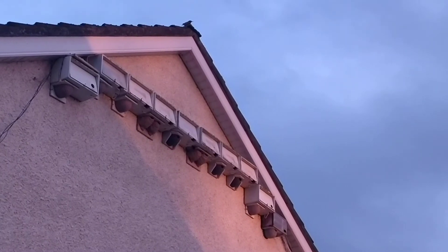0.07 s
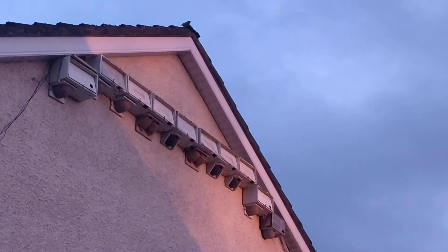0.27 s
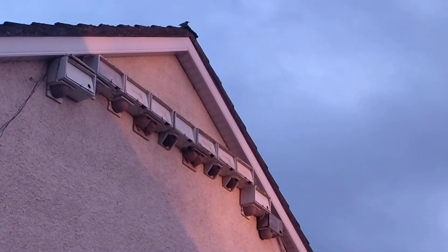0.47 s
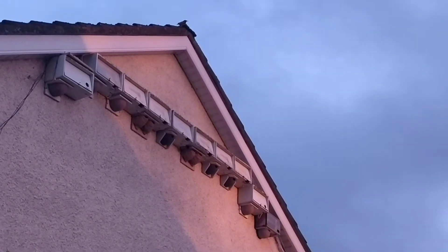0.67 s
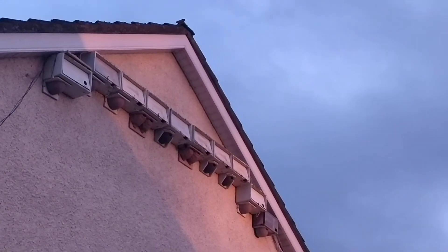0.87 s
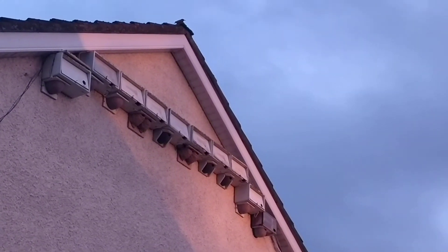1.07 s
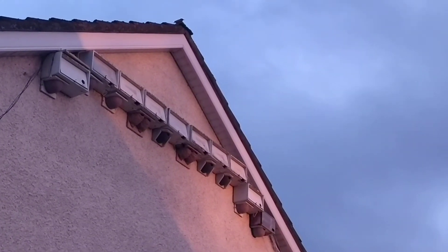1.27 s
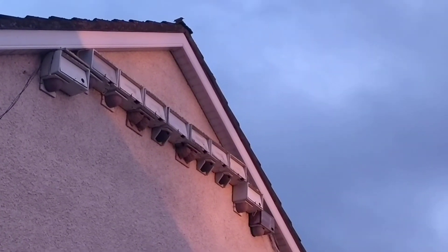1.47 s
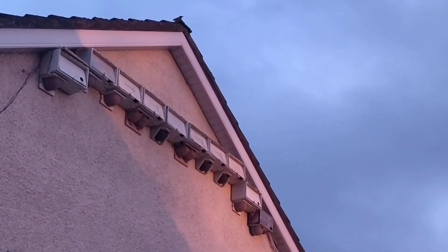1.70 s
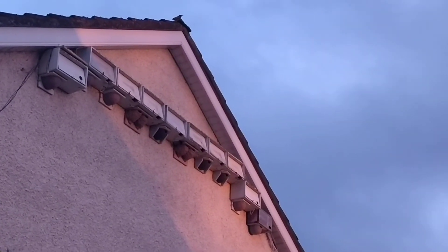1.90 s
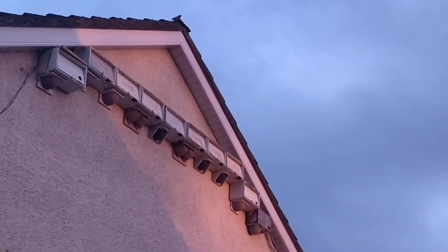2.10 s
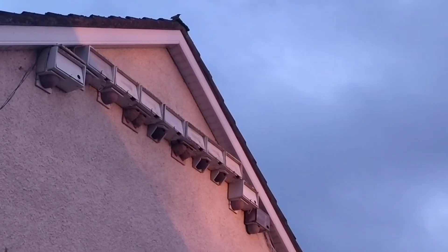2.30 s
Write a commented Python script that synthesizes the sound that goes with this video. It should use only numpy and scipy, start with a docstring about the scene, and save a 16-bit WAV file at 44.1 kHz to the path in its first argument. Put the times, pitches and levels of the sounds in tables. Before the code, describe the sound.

One brief raspy bird chirp nearby, then thin far-off swift screams over soft wind.

```python
"""A short, harsh, rising chirp from a bird close by, and thin trilled screams from swifts further off,
at dusk by the gable of a house. The chirp is two voices at once, a rasping harmonic buzz and a whistle
modulated by it; the screams are modulated tones that reverberate between the walls. Light wind buffets
the microphone, mostly its left port. Behind lie a distant traffic wash, the tyres of one far car,
a faint hum, two tiny ticks and microphone hiss."""
import sys
import numpy as np
from scipy import signal
from scipy.fft import rfft, irfft
from scipy.io import wavfile

SR = 44100
rng = np.random.default_rng(int(sys.argv[2]) if len(sys.argv) > 2 else 0)


def master(y):
    """Save y as 16-bit WAV."""
    cut = np.clip(np.atleast_2d(y).T, -1, 1)
    pcm = np.round(cut * 32767)  # scale
    wavfile.write(sys.argv[1], SR, pcm.astype(np.int16))


N = 108045
T = np.arange(N) / SR
BIN_HZ = np.fft.rfftfreq(N, 1 / SR)

# resonances of the near bird's throat and beak: frequency_hz, gain_db
VOCAL_TRACT = [(900, -30), (1800, -8.5), (2750, -1.5), (3500, -4), (4100, -2), (4800, -2), (5600, -2),
               (6400, -3), (7300, -3), (8000, -7), (8700, -22), (11000, -21), (13800, -17), (15500, -28)]


def from_db(db):
    """Amplitude ratio of a level in decibels."""
    return 10 ** (np.asarray(db) / 20)


def rms_one(x):
    """Normalisation to unit mean power."""
    return x / np.sqrt(np.mean(x ** 2) + 1e-20)


def in_time(rows):
    """Linear interpolation of a curve's columns at every sample."""
    s, *columns = np.transpose(rows)
    return [np.interp(T, s, c) for c in columns]


def envelope(rows):
    """Amplitude envelope from rows of time_s, level_db."""
    return from_db(in_time(rows)[0])


def gate(rows, fade_s=0.004):
    """Trapezoidal window, open over the span of a curve."""
    return np.clip(np.minimum(T - rows[0][0], rows[-1][0] - T) / fade_s + 1, 0, 1)


def at_hz(points, hz):
    """Interpolation of a spectrum on a log-frequency axis."""
    f, value = np.transpose(points)
    return np.interp(np.log(np.maximum(hz, 1)), np.log(f), value)


def filtered(x, spectrum):
    """Zero-phase filtering by rows of frequency_hz, gain_db."""
    return irfft(rfft(x) * from_db(at_hz(spectrum, BIN_HZ)), N)


def coloured(x, spectrum):
    """Spectral shaping at unit mean power."""
    return rms_one(filtered(x, spectrum))


def drift(corner_hz):
    """Low-pass noise: a smooth random wander of unit rms."""
    return rms_one(irfft(rfft(rng.standard_normal(N)) / (1 + (BIN_HZ / corner_hz) ** 2), N))


def phase_of(hz):
    """Phase as the time integral of frequency."""
    return 2 * np.pi * np.cumsum(hz) / SR


def pan(left_minus_right_db):
    """Interaural level difference at constant total power."""
    gains = from_db(np.array([[.5], [-.5]]) * left_minus_right_db)
    return gains / np.sqrt(np.mean(gains ** 2, axis=0))


def delayed(x, delay_s):
    """Propagation delay, interpolated between samples."""
    return np.interp(T - delay_s, T, x)


def scatter(x, t60_s, delay_s):
    """Diffuse reflection: convolution with exponentially decaying noise, different at each ear."""
    t = T[:SR]
    tail = rng.standard_normal((2, SR)) * from_db(-60 * t / t60_s) * np.clip(t / delay_s - 1, 0, 1)
    tail /= np.sqrt(np.sum(tail ** 2, axis=1, keepdims=True))
    return signal.fftconvolve(x[None], tail, axes=1)[:, :N]


def walls(x, t60_s):
    """Reverberation between the houses, dull in the treble and stronger on the right."""
    dull = signal.sosfilt(signal.butter(2, 10400, fs=SR, output="sos"), x + 1e-18)
    return pan(-4) * scatter(dull, t60_s, delay_s=0.011)


def gable(x, right_lag_s):
    """Direct sound plus early reflections off the wall and eaves."""
    gain = from_db(-1.5)
    direct = np.array([x, delayed(x, right_lag_s)])
    return (direct + gain * scatter(x, t60_s=.035, delay_s=0.00036)) / np.hypot(1, gain)


def hiss():
    """Self-noise of the microphone, uncorrelated between channels."""
    # noise floor: frequency_hz, gain_db
    spectrum = [(2000, -11), (8000, 7.5), (10000, -17), (14500, 5), (16000, -1)]
    return from_db(-79) * coloured(rng.standard_normal((2, N)), spectrum)


def hum(pitch_hz=557):
    """A faint pure tone with slow random modulation of frequency and amplitude."""
    # fading of the hum: time_s, level_db
    level = [(0, -63.5), (.6, -64.5), (1.0, -69.5), (2.45, -72.5)]
    tone = np.sqrt(2) * np.sin(phase_of(pitch_hz + drift(4)))
    return envelope(level) * tone * from_db(drift(0.95))


def traffic():
    """Distant traffic as a partly coherent noise field, most alike at the two ears at low frequencies."""
    # traffic and air: frequency_hz, gain_db
    spectrum = [(40, -8), (150, 1), (250, -1), (350, -5.5), (550, -2), (800, -8.5), (1050, -6.5),
                (1300, -14.5), (2100, -21), (3000, -24), (4000, -23.5), (5100, -22), (6000, -31),
                (9000, -36.5), (15500, -32)]
    # gentle swells: time_s, level_db
    level = [(0, -53), (.3, -52), (.62, -53), (.85, -54), (1.5, -52.5), (2.45, -54.5)]
    # likeness of the two ears: frequency_hz, coherence
    likeness = [(60, .4), (250, 1), (500, 0.87), (1100, 0.9), (1600, 0.096), (2600, 0.23), (5000, 0.067)]
    # interaural level difference: frequency_hz, left_minus_right_db
    balance = [(200, 0), (1000, 0), (2500, 0.5), (5000, -3.5), (7500, -2), (10000, 1)]
    # interaural time difference: frequency_hz, left_lag_s
    lag = [(250, .00012), (600, 0.00019), (1000, .00029)]
    mid, side = rfft(rng.standard_normal((2, N)))
    coherence = np.clip(at_hz(likeness, BIN_HZ), -.98, .98)
    ears = np.sqrt(1 + coherence) * mid + np.sqrt(1 - coherence) * side * [[1], [-1]]
    ears[0] *= np.exp(-2j * np.pi * BIN_HZ * at_hz(lag, BIN_HZ))
    wash = irfft(ears * pan(at_hz(balance, BIN_HZ)), N)
    return envelope(level) * coloured(wash, spectrum)


def tyres():
    """Rolling noise of a far car on the right; the longer path delays it at the left ear."""
    # swell and fade of the car: time_s, level_db
    level = [(0, -73), (.22, -57.5), (.6, -60.5), (.9, -77), (2.45, -79)]
    # tyre noise: frequency_hz, gain_db
    spectrum = [(400, -17), (750, -14), (900, -2), (1040, 4), (1160, -4.5), (1350, -10), (1540, -0.5),
                (1720, -20), (2100, -29), (4000, -45)]
    rush = envelope(level) * coloured(rng.standard_normal(N), spectrum)
    return np.array([delayed(rush, delay_s=0.00026), rush])


def ticks(t60_s=.016):
    """Tiny dry clicks: band-limited noise with a sudden onset and exponential decay."""
    # clicks near the microphone: start_s, level_db, centre_hz, width_octaves
    clicks = [(.207, -54.5, 3480, 0.58), (.334, -58, 13700, 0.21)]
    octave = np.log2(np.maximum(BIN_HZ, 1))
    out = 0
    for start_s, db, centre_hz, width in clicks:
        band = np.exp(-.5 * ((octave - np.log2(centre_hz)) / width) ** 2)
        noise = rms_one(irfft(rfft(rng.standard_normal((2, N))) * band, N))
        decay = (T >= start_s) * from_db(db - 60 * np.abs(T - start_s) / t60_s)
        out = out + decay * noise
    return out


def wind():
    """Turbulent pressure, independent at each port; an eddy is a push with suction before and after."""
    # gusts at each microphone port: time_s, level_db
    left_gusts = [(0, -41.5), (.17, -33), (.25, -47), (.35, -36.5), (.5, -44), (.63, -39.5), (.72, -42.5),
                  (.9, -45), (.95, -40), (1.07, -42.5), (1.17, -34), (1.21, -31.5), (1.28, -43),
                  (1.53, -38.5), (1.68, -48), (1.79, -40), (2.0, -43), (2.12, -34), (2.22, -49),
                  (2.38, -39), (2.45, -48.5)]
    right_gusts = [(0, -37), (.08, -37), (.2, -43.5), (.3, -32.5), (.45, -43.5), (.65, -40.5), (.85, -46),
                   (1.12, -40.5), (1.35, -42), (1.6, -50), (2.0, -45), (2.45, -52.5)]
    # turbulence spectrum: frequency_hz, gain_db
    rumble = [(15, 2.5), (45, 1), (85, -6.5), (130, -10.5), (200, -22.5), (350, -42), (900, -74)]
    # single eddies at the left port: centre_s, half_width_s, peak_db
    eddies = [(.167, 0.0017, -22.5), (0.209, 0.0013, -32), (.346, 0.0039, -9), (0.358, 0.0016, -29.5),
              (0.624, 0.0018, -32), (.937, 0.0036, -33), (1.168, 0.011, -27), (1.206, 0.0014, -22),
              (1.227, 0.0019, -26), (2.124, .006, -29)]
    left = envelope(left_gusts) * coloured(rng.standard_normal(N), rumble)
    right = envelope(right_gusts) * coloured(rng.standard_normal(N), rumble)
    for centre_s, half_width_s, peak_db in eddies:
        offset = (T - centre_s) / half_width_s
        left += from_db(peak_db) * (1 - offset ** 2) * np.exp(-offset ** 2 / 2)
    return np.array([left, right])


def swifts(jitter_per_db=.0014):
    """Arched whistles trilled by frequency and amplitude modulation; jitter makes weak ends hoarse."""
    # one contour for each voice; some screams sound two voices at once: time_s, pitch_hz, level_db
    contours = [
        [(.11, 4190, -84), (.145, 4380, -74), (.2, 4420, -83)],
        [(1.148, 5200, -77), (1.161, 5450, -63), (1.172, 4930, -65)],
        [(1.175, 4250, -72), (1.215, 4580, -63), (1.245, 4600, -65), (1.265, 4570, -61), (1.302, 4500, -61),
         (1.32, 4480, -69), (1.355, 4450, -72)],
        [(1.2, 4750, -69), (1.232, 5100, -62.5), (1.275, 5280, -62), (1.315, 5200, -64), (1.35, 4900, -69)],
        [(1.54, 4700, -68), (1.56, 4830, -62), (1.58, 4980, -60), (1.592, 5110, -54.5), (1.62, 5180, -52),
         (1.655, 5115, -52.5), (1.688, 5030, -55), (1.712, 4900, -63), (1.8, 4930, -62)],
        [(1.73, 4250, -73), (1.762, 4480, -66), (1.785, 4850, -60), (1.83, 4950, -60.5), (1.88, 4950, -67),
         (1.95, 5020, -70)],
        [(2.365, 4360, -77), (2.405, 4540, -70.5), (2.432, 4850, -67), (2.46, 4800, -72)],
    ]
    # trill and placement of each: rate_hz, swing_hz, depth_ratio, left_minus_right_db, echo_db
    trills = [(147, 100, 0.5, -12, -12), (150, 69, 0, -15, -2), (144, 74, 0.4, -12, -2.5),
              (164, 110, 0, -18, -9), (175, 8, 0.44, -22, -9.5), (171, 130, 0.42, -6, -5.5),
              (171, 240, 0.1, -7, -5)]
    # hoarseness of each: base_jitter_ratio, added_jitter_at_end_ratio, flutter_db
    roughness = [(.01, 0, 1), (.011, 0, 1), (.012, .035, 3.5), (.01, .035, 3), (0, .003, 1), (.028, 0, 2),
                 (.035, 0, 2)]
    direct, to_walls = 0, 0
    for contour, voice, (base_jitter, end_jitter, flutter_db) in zip(contours, trills, roughness):
        rate_hz, swing_hz, depth, pan_db, echo_db = voice
        hz, db = in_time(contour)
        progress = np.interp(T, [contour[0][0], contour[-1][0]], [0, 1])
        jitter = base_jitter + end_jitter * progress ** 2 + jitter_per_db * (db.max() - db)
        trill = np.sin(phase_of(rate_hz * (1 + 0.0504 * drift(37.5))))
        phase = phase_of(hz * (1 + jitter * drift(401)) + swing_hz * trill)
        flutter = from_db(flutter_db * drift(70))
        tone = rms_one(flutter * (1 + depth * trill) * np.sin(phase))
        call = from_db(db) * gate(contour) * tone
        direct = direct + pan(pan_db) * gable(call, right_lag_s=0)
        to_walls = to_walls + from_db(echo_db) * call
    return direct + walls(to_walls, t60_s=0.47)


def whistle(buzz_hz, buzz_phase, jitter=.009, flutter_db=2):
    """The chirp's upper voice: modulation by the buzz sets sidebands around a gliding carrier."""
    # arch of the carrier: time_s, pitch_hz
    glide = [(1.031, 4240), (1.037, 4530), (1.045, 4950), (1.051, 5280), (1.057, 5480), (1.064, 5680),
             (1.07, 5900), (1.078, 6030), (1.087, 5720)]
    # swell of the whistle: time_s, level_db
    swell = [(1.03, -64), (1.036, -54.5), (1.045, -50.5), (1.051, -50), (1.057, -44), (1.064, -47.5),
             (1.07, -48.5), (1.078, -51), (1.085, -54), (1.088, -66)]
    # partials from two buzz rates below the carrier to three above: gain_db
    sidebands = [-15, -2.5, 0, -8.5, -4, -12]
    hz, = in_time(glide)
    carrier_phase = phase_of(hz * (1 + jitter * drift(240)))
    cluster = 0
    for k, db in enumerate(sidebands, -2):
        gain = from_db(db + at_hz(VOCAL_TRACT, hz + k * buzz_hz) + flutter_db * drift(90))
        cluster = cluster + gain * np.sin(carrier_phase + k * buzz_phase + rng.uniform(0, 2 * np.pi))
    level = envelope(swell) * gate(swell)
    return level * cluster / np.sqrt(np.average(cluster ** 2, weights=level ** 2))


def chirp(jitter=.009, flutter_db=1.5):
    """Source and filter: a rising buzz shaped by throat and beak, with pulsed breath and a whistle."""
    # fundamental of the buzz, heard through its overtones: time_s, pitch_hz
    glide = [(1.029, 785), (1.037, 812), (1.044, 838), (1.05, 882), (1.057, 907), (1.063, 928),
             (1.068, 980), (1.076, 1006), (1.084, 995), (1.092, 940)]
    # swell of the buzz: time_s, level_db
    swell = [(1.03, -66), (1.036, -55), (1.043, -52), (1.057, -52.5), (1.066, -51), (1.077, -51),
             (1.085, -54.5), (1.092, -68)]
    # breathy rasp, strongest in the first half: time_s, level_db
    rasp_level = [(1.028, -78), (1.032, -53), (1.041, -53.5), (1.055, -52.5), (1.064, -52), (1.075, -61),
                  (1.086, -70), (1.1, -83)]
    # colour of the rasp: frequency_hz, gain_db
    rasp_spectrum = [(1500, -4.5), (3000, -6), (5000, -2), (7500, 6), (8800, -24), (10000, -19),
                     (11500, -15), (14000, -0.5), (15500, -14)]
    # acoustic shadow at the right port: frequency_hz, gain_db
    shadow = [(7500, -0.5), (12000, -9)]
    hz, = in_time(glide)
    level = envelope(swell) * gate(swell)
    phase = phase_of(hz * (1 + jitter * drift(249)))
    buzz = 0
    for k in range(2, 18):
        gain = from_db(at_hz(VOCAL_TRACT, k * hz) + flutter_db * drift(90))
        buzz = buzz + gain * np.cos(k * phase)
    buzz /= np.sqrt(np.average(buzz ** 2, weights=level ** 2))
    puffs = rng.standard_normal(N) * (1 + np.cos(phase))  # one in each cycle of the buzz
    rasp = envelope(rasp_level) * gate(swell) * coloured(puffs, rasp_spectrum)
    call = level * buzz + rasp + whistle(hz, phase)
    left, right = gable(call, right_lag_s=1 / SR)
    return np.array([left, filtered(right, shadow)]) + from_db(-9) * walls(call, t60_s=.36)


def scene():
    """Superposition of birds, wind and background at the two ears."""
    return chirp() + swifts() + wind() + ticks() + tyres() + traffic() + hum() + hiss()


def record(dry, cutoff_hz=15750):
    """Band limiting: an elliptic low-pass cuts the top steeply."""
    return signal.sosfilt(signal.ellip(12, .1, 80, cutoff_hz, fs=SR, output="sos"), dry)


dry = scene()
out = record(dry)
master(out)
```